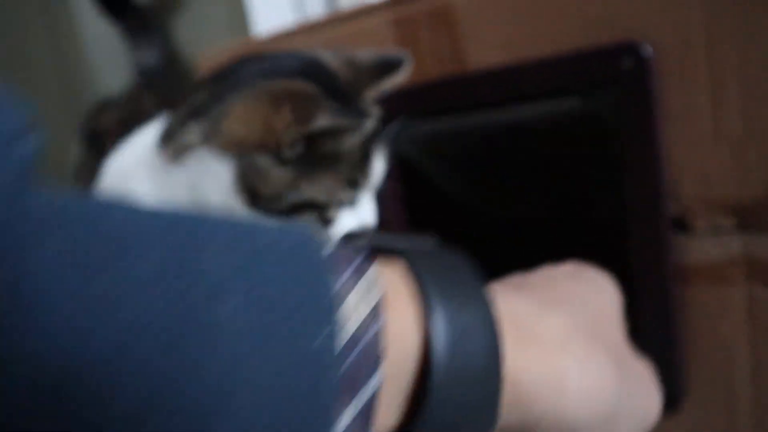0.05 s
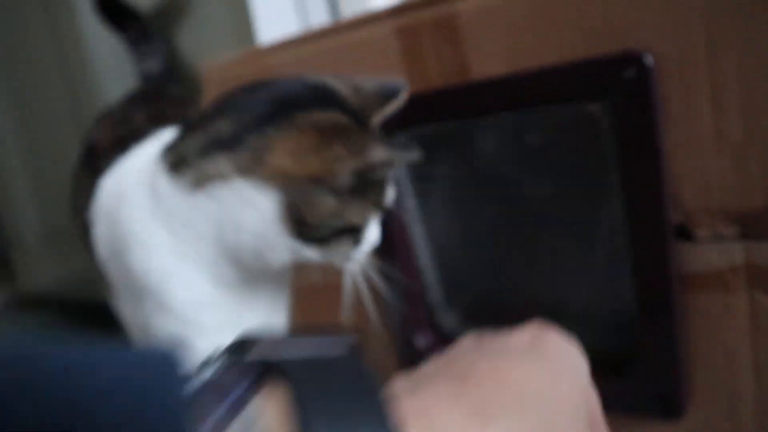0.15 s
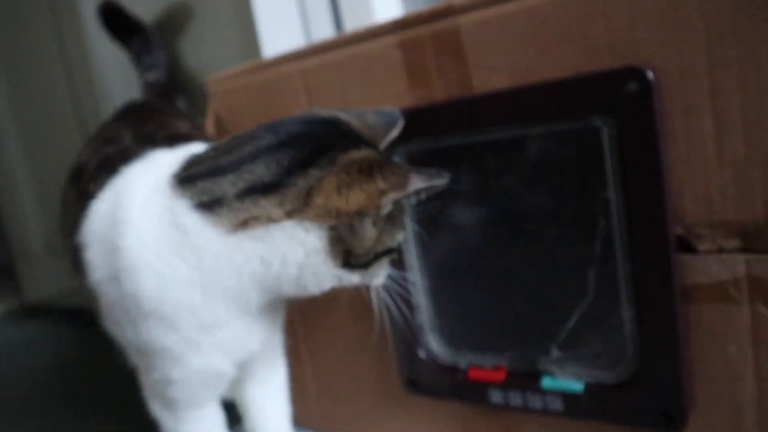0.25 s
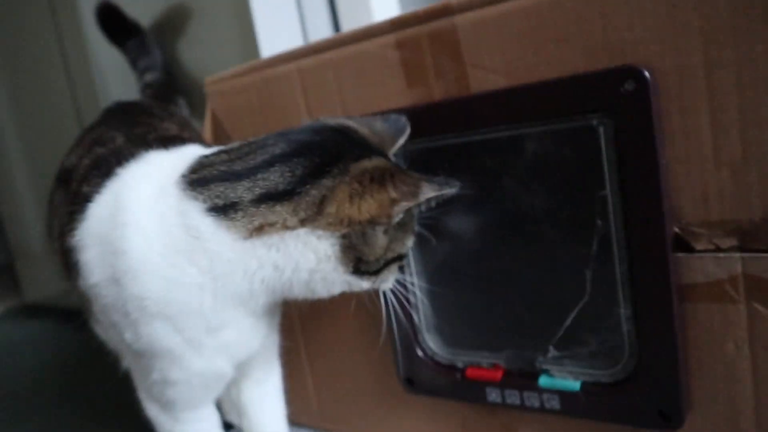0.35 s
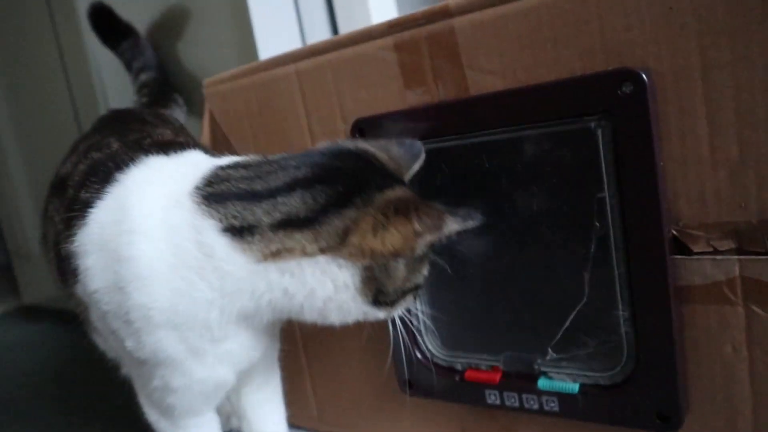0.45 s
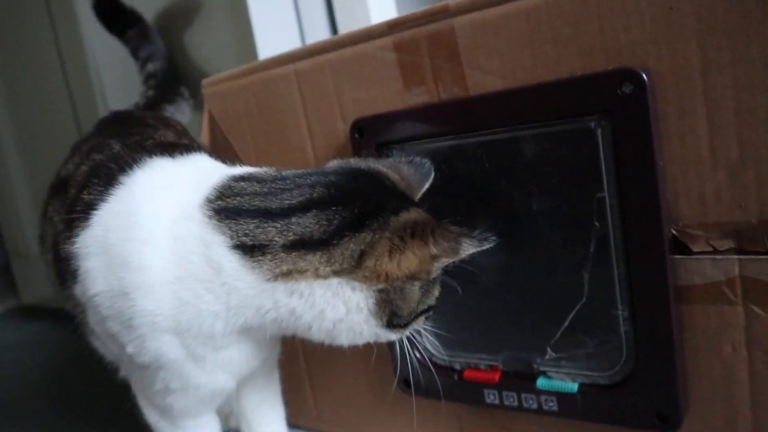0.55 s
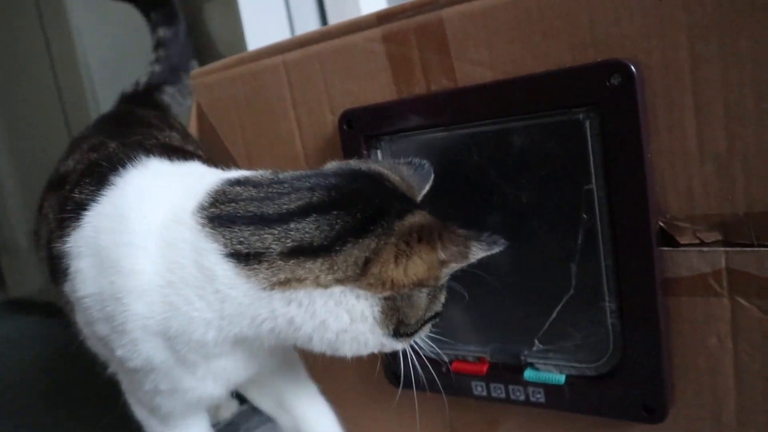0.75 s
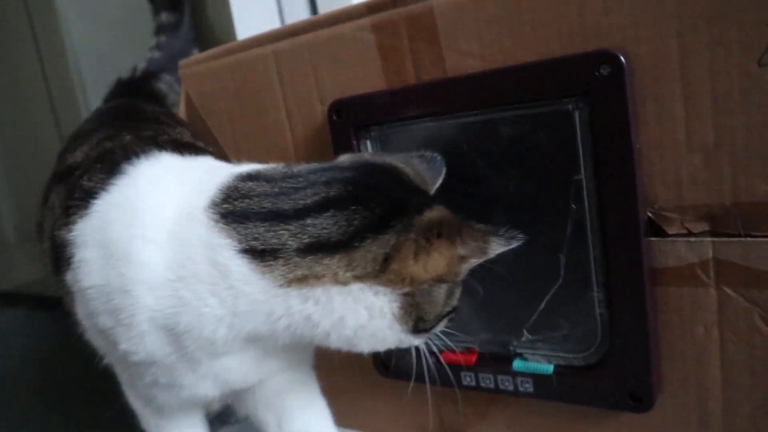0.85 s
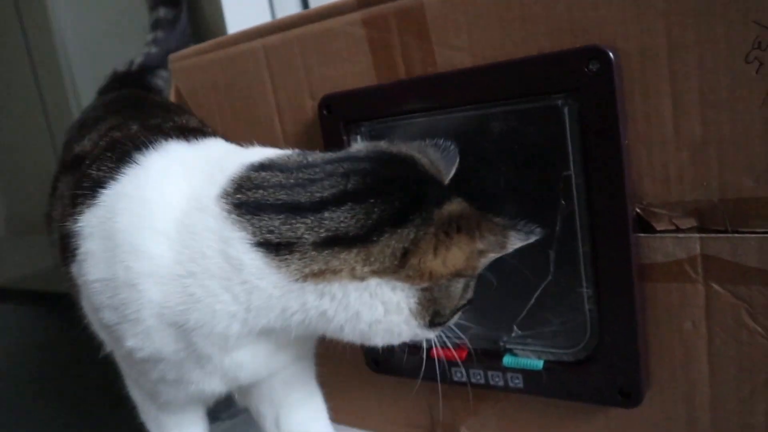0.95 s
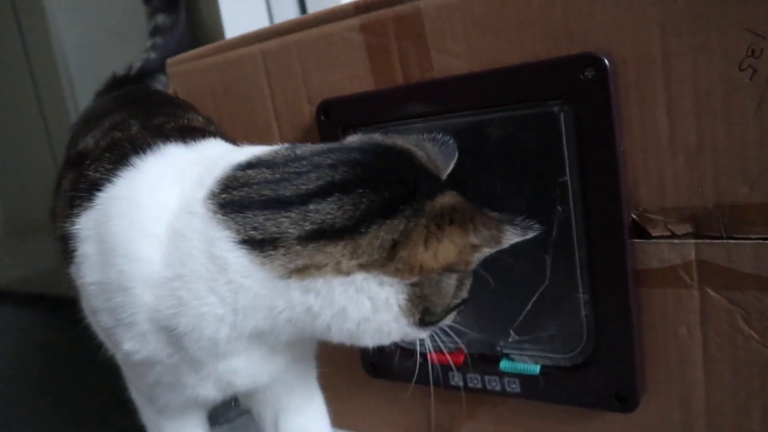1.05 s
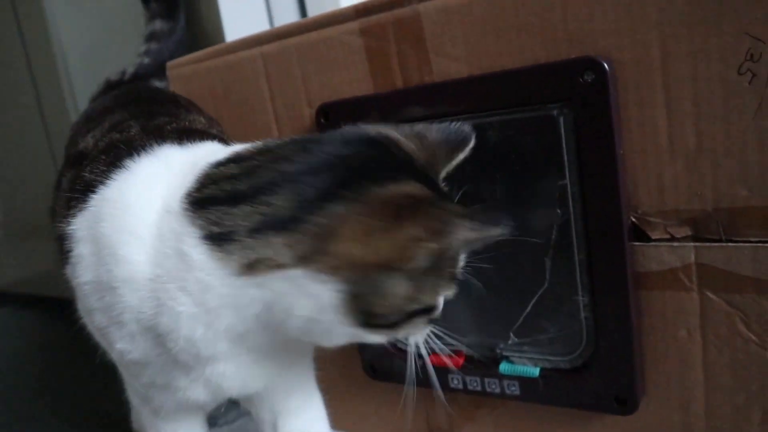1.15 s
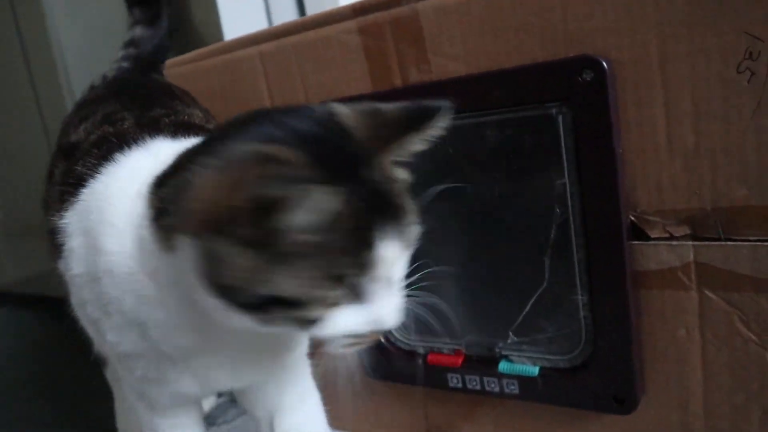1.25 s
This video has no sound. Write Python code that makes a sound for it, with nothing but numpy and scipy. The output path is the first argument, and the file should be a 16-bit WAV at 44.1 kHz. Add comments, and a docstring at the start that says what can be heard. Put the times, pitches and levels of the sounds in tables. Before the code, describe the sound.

Plastic pet door flap creaks briefly, then claps shut against its frame with a boxy thump

```python
"""A plastic pet flap in a cardboard box, over the hush of a small room (filtered noise, unlike on the two sides).
First an earlier knock dies away (decaying noise bands); its low ring still sounds faintly in the box. The hinge
creaks: a train of slips with rubbing noise rings the flap. After soft low pushes the flap knocks and bounces: pulses
ring the box, noise bursts its hard edge, and the room rings on. Last, faint ticks, each one short decaying sine."""
import sys
import numpy as np
from scipy import signal
from scipy.io import wavfile

SR = 44100
rng = np.random.default_rng(int(sys.argv[2]) if len(sys.argv) > 2 else 0)


def log_audio(samples):
    """Write samples as a 16-bit WAV file to the path given in sys.argv[1]."""
    # one column per channel
    frames = np.atleast_2d(samples).T
    # limit to full scale, then quantise
    limited = np.clip(frames, -1, 1)
    pcm = np.round(limited * 32767).astype(np.int16)
    wavfile.write(sys.argv[1], SR, pcm)


def gain_from_db(level_db):
    """Turn a decibel level (scalar or array-like) into a linear amplitude factor."""
    decades = np.asarray(level_db, float) / 20
    return 10 ** decades


N = 57330

# room hush, part alike on both sides: (frequency [Hz], relative density [dB per Hz])
HUSH_SPECTRUM = [(15, -35), (25, 1.5), (53, 6), (76, -9.5), (153, -9.5), (179, -3.5), (275, -12.5),
                 (388, -9.5), (520, -14), (2370, -23), (7860, -38), (14500, -61.5)]
# room hush, part opposite on the two sides: (frequency [Hz], relative density [dB per Hz])
HUSH_SIDE_SPECTRUM = [(15, -84), (25, -57), (170, -12.5), (275, -6.5), (468, -2.5), (644, -1.5),
                      (1130, -0.5), (7650, -16.5), (12400, -24.5), (14500, -44.5)]
# hush level, before HUSH_OVER_DB is added: (time [s], level [dB])
HUSH_LEVEL = [(0.5, -63), (0.692, -63.5), (0.698, -64.5), (0.818, -59.5), (0.978, -63.5), (1.028, -60.5),
              (1.3, -64)]
HUSH_OVER_DB, HUSH_SIDE_DB, HUSH_PATCHY_DB = 5.5, -3.5, 0.6

# room tail, part alike on both sides: (frequency [Hz], relative density [dB per Hz])
TAIL_SPECTRUM = [(88, -11.5), (150, 5), (477, -8), (590, -16), (720, -2), (900, -21), (2500, -23),
                 (4570, -29), (7000, -38.5), (9000, -63), (14000, -84.5)]
# room tail, part opposite on the two sides: (frequency [Hz], relative density [dB per Hz])
TAIL_SIDE_SPECTRUM = [(150, -58), (314, -24.5), (470, -16), (711, -8.5), (1100, -20.5), (2590, -13.5),
                      (5000, -17), (8000, -17.5), (14000, -35.5)]
# room decay: (frequency [Hz], t60 [s])
TAIL_T60 = [(150, 0.23), (420, 0.38), (1100, 0.28), (2900, .2), (6000, 0.078), (9000, .07)]
TAIL_DB, TAIL_SIDE_DB, TAIL_START_S, TAIL_RISE_S = -17, -29, 0.207, 0.0054
EARLIER_TAIL_DB, EARLIER_AGE_S = -11, 0.097  # a knock already dying at time 0

# earlier knock's low ring, soft low pushes, then flap knocks and bounces:
# (time [s], push on the box [dB], relative crack level [dB], softness [Hz])
PUSHES_AND_KNOCKS = [(.001, -40.5, -85, 120), (0.188, -31, -79, 140), (.1985, -33.5, -71.5, 320),
                     (.2052, -44, -39.5, 2017), (.208, -43.5, -33.5, 911), (0.2106, -12.5, -30.5, 900),
                     (0.2115, -13.5, -24.5, 1000), (.2228, -22, -32, 1183), (.2262, -28, -42, 1225)]
# direction of each push or knock: (sign [+1 or -1])
PUSH_SIGNS = [1, 1, -1, 1, 1, -1, 1, 1, -1]
# box and flap modes: (frequency [Hz], level [dB], t60 [s], left-right lean [-1..1])
BOX_MODES = [(68, -9, .5, 0.025), (101.5, -11.5, 0.52, 0.082), (136.8, -13, 0.54, 0.059),
             (159.1, -4, 0.33, 0), (200, -3.5, 0.032, 0.01), (187, -15.5, 0.32, 0), (229.1, -7, 0.24, 0.15),
             (268, -18.5, 0.11, .02), (316.6, -1, 0.092, 0), (353, -6, 0.059, 0), (360, -4, .02, 0.42),
             (424.5, -6.5, 0.18, .05), (474.6, -9, 0.24, .05), (602, -16.5, 0.16, .1),
             (649, -19.5, 0.12, .1), (701, -13, 0.15, 0.11), (716.5, -10, 0.18, .15),
             (808.7, -7, 0.077, .15), (910, -20, 0.28, .2), (1228, -27.5, 0.2, 0.28)]
# hard plastic edge modes: (frequency [Hz], level [dB], t60 [s], left-right lean [-1..1])
EDGE_MODES = [(1594, -8.5, 0.012, .3), (1974.3, -8.5, 0.12, -0.15), (2432, -6, .04, -.3),
              (2744, -11, .05, .6), (3615, -10.5, 0.014, .3), (4620, 0.5, 0.0042, -.3),
              (5420, -10.5, 0.0059, .4), (7840, -19, 0.01, -.8), (10630, -30, .003, .6)]
BOX_LOWEST_HZ, EDGE_LOWEST_HZ, ALIKE_BELOW_HZ = 63, 1300, 470
CRACK_DECAY_S, CRACK_SIDE_DB = 0.0015, -7.5

# hinge slips: (time [s], relative level [dB], slip rate [1/s], gain of the flap modes [dB])
CREAK = [(.049, -60, 335, 0), (.051, -39, 335, 3), (.062, -38, 345, 4), (.072, -35, 340, -2),
         (.083, -40, 330, 2), (.098, -35, 322, -4), (.120, -37, 325, -1), (.127, -47, 315, -1),
         (.134, -43, 310, -4), (.15, -50, 290, -3), (.185, -52, 260, -3)]
# flap modes rung by slips and rubbing: (frequency [Hz], level [dB], t60 [s], left-right lean [-1..1])
CREAK_MODES = [(570, -9.5, .05, 0.099), (680, -18.5, 0.072, .12), (840, -39, 0.016, .15),
               (1000, -54.5, .02, .2), (1500, -23.5, 0.015, 0.78), (1696, -36.5, .04, 0.68)]
# low mode rung by slips alone: (frequency [Hz], level [dB], t60 [s], left-right lean [-1..1])
CREAK_LOW_MODES = [(350, 2.5, 0.028, 0.074)]
CREAK_JITTER, CREAK_UNEVEN_DB = 0.03, 1.5
CREAK_RUB_DB, CREAK_BOX_DB = -9.5, -1.5  # rubbing noise; share of it that shakes the box
CREAK_LOWEST_HZ, CREAK_TOP_HZ = 120, 2180

# tick onsets: (time [s])
TICK_TIMES = [.672, .7792, .796, .800, .819, .823, .874]
# tick rings: (level [dB], frequency [Hz], t60 [s])
TICKS = [(-58, 1630, 0.0096), (-39.5, 2030, 0.0035), (-56, 3300, 0.01), (-56, 3900, 0.021),
         (-48.5, 480, 0.036), (-56, 3500, 0.012), (-45, 660, 0.015)]
TICK_LEAN = 0.1

BASS_CUT_HZ, TOP_CUT_HZ = 36.5, 9000
OPPOSITE = np.array([[1], [-1]])  # left plus, right minus


def cut(x, hz, kind):
    """Second-order Butterworth low- or high-pass."""
    return signal.sosfilt(signal.butter(2, hz, kind, fs=SR, output="sos"), x)


def rms_one(x):
    """Scales to rms 1."""
    return x / np.sqrt(np.mean(x ** 2) + 1e-20)


def in_time(rows):
    """Interpolates each column of a time table to every sample."""
    s, *columns = np.transpose(rows)
    return [np.interp(np.arange(N) / SR, s, c) for c in columns]


def at_hz(points, hz):
    """Interpolates a frequency table over log frequency."""
    table_hz, values = np.transpose(points)
    return np.interp(np.log(hz), np.log(table_hz), values)


def drift(rate_hz):
    """Slow random wander of spread 1: low-passed noise at one value per 40 samples."""
    r = np.exp(-80 * np.pi * rate_hz / SR)
    noise = rng.standard_normal(N // 40 + 2002)
    slow = signal.lfilter([1], [1, -2 * r, r * r], noise)[2000:]  # drop the settling
    return np.interp(np.arange(N) / 40, np.arange(len(slow)), rms_one(slow - slow.mean()))


def ring(clicks, hz, t60_s):
    """Two-pole resonator: a unit click starts a decaying sine of height 1."""
    r = gain_from_db(-60 / (t60_s * SR))
    w = 2 * np.pi * hz / SR
    return signal.lfilter([0, np.sin(w)], [1, -2 * r * np.cos(w), r * r], clicks + 1e-18)


def body(clicks, modes):
    """Sums ringing modes; each leans to one side, but the bass reaches both alike."""
    rings = [(gain_from_db(db) * ring(clicks, hz, t60_s), lean) for hz, db, t60_s, lean in modes]
    middle = sum(r for r, _ in rings)
    side = sum(r * lean for r, lean in rings)
    return middle + cut(side, ALIKE_BELOW_HZ, "high") * OPPOSITE


def bands(spectrum, shape):
    """Third-octave noise bands of total rms 1, each then shaped in time by shape(hz)."""
    edges_hz = 24 * 2 ** np.arange(0, 9.4, 1 / 3)
    white = rng.standard_normal((2, N + 8000))
    parts = []
    for k, (low_hz, high_hz) in enumerate(zip(edges_hz, edges_hz[1:])):
        hz = np.sqrt(low_hz * high_hz)
        sos = signal.butter(2, [low_hz, high_hz], "band", fs=SR, output="sos")
        band = signal.sosfilt(sos, white[k % 2])[8000:]  # neighbours use separate noises
        parts.append((hz, gain_from_db(at_hz(spectrum, hz)) * band))
    total_rms = np.sqrt(np.mean(sum(p for _, p in parts) ** 2))
    return sum(p * shape(hz) for hz, p in parts) / total_rms


def hush():
    """Room noise whose bands wander slightly; alike on both sides in the deep bass, wide in the treble."""
    level_db, = in_time(HUSH_LEVEL)

    def patch(hz):
        return gain_from_db(HUSH_PATCHY_DB * drift(18.0))

    middle = bands(HUSH_SPECTRUM, patch)
    side = gain_from_db(HUSH_SIDE_DB) * bands(HUSH_SIDE_SPECTRUM, patch)
    return gain_from_db(level_db + HUSH_OVER_DB) * (middle + side * OPPOSITE)


def tail():
    """The room's answer to the earlier and the main knock: noise bands dying at their own rates, treble fastest."""
    t = np.arange(N) / SR
    age_s = np.maximum(t - TAIL_START_S, 0)

    def shape(hz):
        fall_db_per_s = -60 / at_hz(TAIL_T60, hz)
        main = (1 - np.exp(-age_s / TAIL_RISE_S)) * gain_from_db(fall_db_per_s * age_s)
        earlier = gain_from_db(EARLIER_TAIL_DB + fall_db_per_s * (t + EARLIER_AGE_S))
        return main + earlier

    middle = gain_from_db(TAIL_DB) * bands(TAIL_SPECTRUM, shape)
    side = gain_from_db(TAIL_SIDE_DB) * bands(TAIL_SIDE_SPECTRUM, shape)
    return middle + side * OPPOSITE


def pushes_and_knocks():
    """Each push or knock drives the box with a soft pulse; knocks also crack the edge with a noise burst."""
    push, crack, t = np.zeros(N), np.zeros((2, N)), np.arange(N) / SR
    for (s, push_db, crack_db, soft_hz), sign in zip(PUSHES_AND_KNOCKS, PUSH_SIGNS):
        phase = np.clip((t - s) * soft_hz, 0, 1)  # the pulse lasts 1 / soft_hz
        pulse = np.sin(np.pi * phase) ** 2 * 2 * soft_hz / SR  # unit area
        push += sign * gain_from_db(push_db) * pulse
        decay = (t >= s) * np.exp(-np.clip(t - s, 0, 30 * CRACK_DECAY_S) / CRACK_DECAY_S)
        crack += gain_from_db(crack_db - 14) * rng.standard_normal((2, N)) * decay  # negligible for pushes
    crack = cut(crack, EDGE_LOWEST_HZ, "high")
    box = body(cut(push, BOX_LOWEST_HZ, "high"), BOX_MODES)
    edge = body(crack[0], EDGE_MODES)
    edge_side = gain_from_db(CRACK_SIDE_DB) * body(crack[1], EDGE_MODES).mean(0)
    return box + edge + edge_side * OPPOSITE


def creak():
    """The hinge sticks and slips in an uneven run; slips and rubbing ring the flap, rubbing also the box."""
    level_db, slips_per_s, flap_db = in_time(CREAK)
    t = np.arange(N) / SR
    on = gain_from_db(level_db - 3) * (t > CREAK[0][0]) * (t < CREAK[-1][0])
    count = np.cumsum(slips_per_s * (1 + CREAK_JITTER * drift(100))) / SR
    slips = np.diff(np.floor(count), prepend=0) > 0  # a click at each whole count
    slips = slips * gain_from_db(CREAK_UNEVEN_DB * rng.standard_normal(N))
    slips = on * (slips - slips_per_s / SR)  # less the nominal mean
    rub = on * gain_from_db(CREAK_RUB_DB) * rng.standard_normal(N) * np.sqrt(slips_per_s / SR)
    slips, rub = cut(cut([slips, rub], CREAK_TOP_HZ, "low"), CREAK_LOWEST_HZ, "high")
    low = body(slips, CREAK_LOW_MODES)
    flap = body((slips + 2 * rub) * gain_from_db(flap_db), CREAK_MODES)
    box = gain_from_db(CREAK_BOX_DB) * body(rub, BOX_MODES)
    return low + flap + box


def ticks():
    """Small dry ticks: each click rings one short resonance."""
    out = np.zeros(N)
    for s, (db, hz, t60_s) in zip(TICK_TIMES, TICKS):
        click = gain_from_db(db) * (np.arange(N) == int(s * SR))
        out += ring(click, hz, t60_s)
    return out * [[1 + TICK_LEAN], [1 - TICK_LEAN]]


def scene():
    """Sums all layers in stereo."""
    return pushes_and_knocks() + tail() + creak() + ticks() + hush()


def roll_off(x):
    """The treble ends steeply here."""
    return signal.sosfilt(signal.butter(12, 14740, fs=SR, output="sos"), x)


def record(dry):
    """The microphone cuts the deepest bass, twice over, and softens the top."""
    x = cut(cut(dry, BASS_CUT_HZ, "high"), BASS_CUT_HZ, "high")
    mix = cut(x, TOP_CUT_HZ, "low")
    return roll_off(mix)


dry = scene()
out = record(dry)
log_audio(out)
```